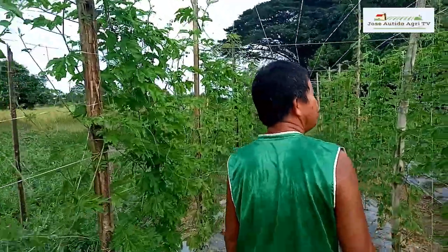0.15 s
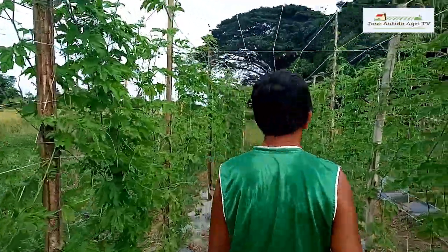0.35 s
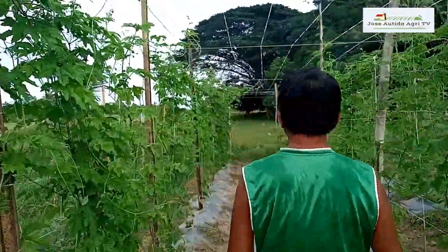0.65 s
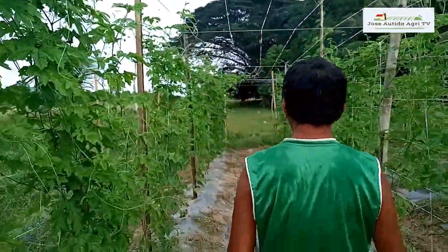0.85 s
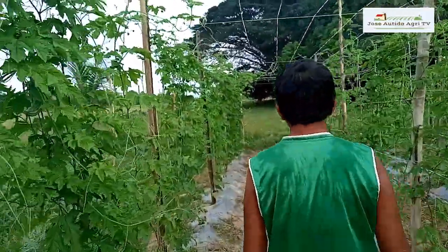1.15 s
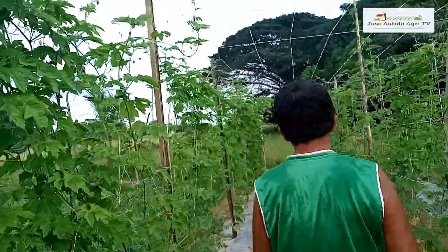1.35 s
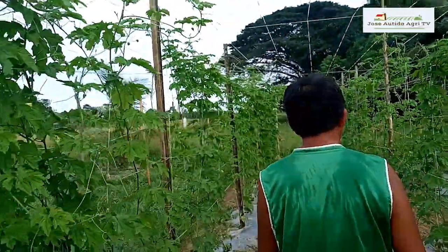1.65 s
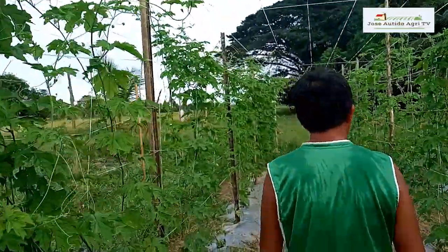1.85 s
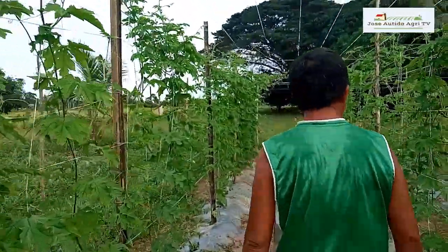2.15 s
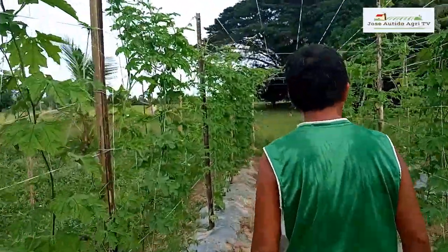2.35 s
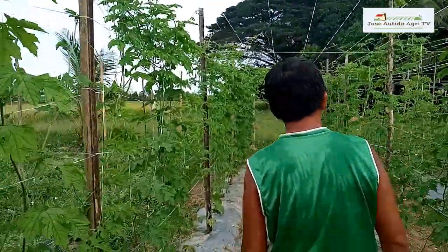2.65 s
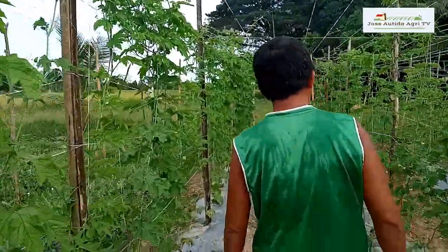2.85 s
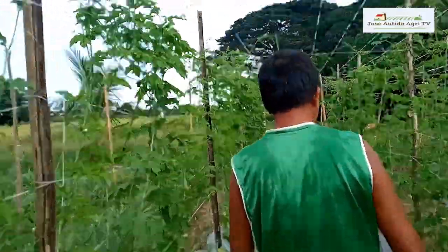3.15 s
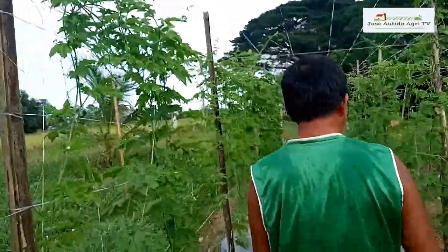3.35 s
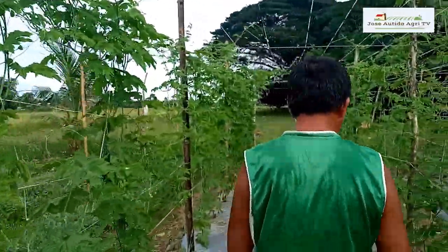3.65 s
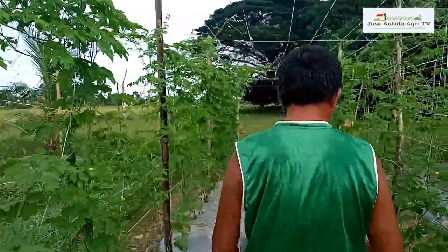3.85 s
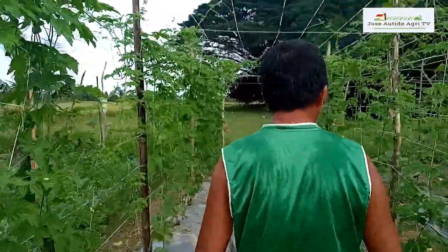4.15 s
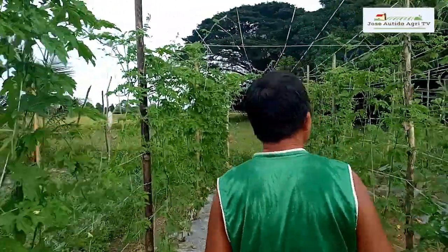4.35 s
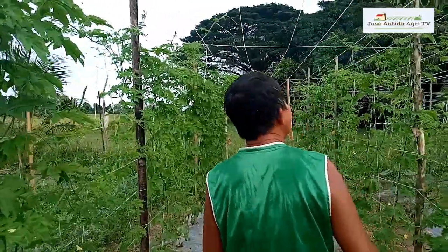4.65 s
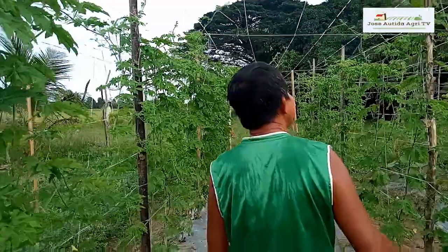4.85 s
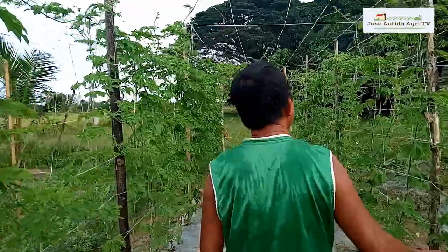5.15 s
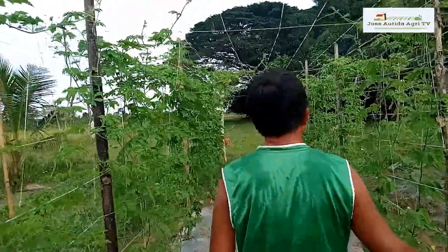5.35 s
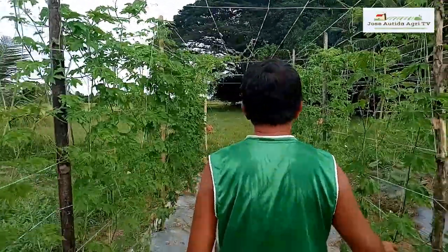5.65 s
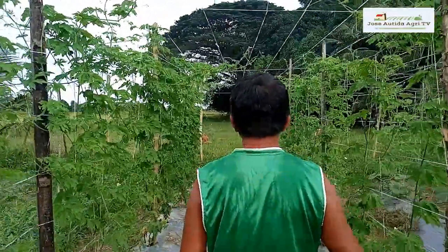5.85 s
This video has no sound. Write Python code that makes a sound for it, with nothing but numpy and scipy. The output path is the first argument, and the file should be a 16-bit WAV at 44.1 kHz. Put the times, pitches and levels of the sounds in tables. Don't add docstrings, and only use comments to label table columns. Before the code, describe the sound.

A young goat bleats twice with a short grunt between, while legs swish through grass, roosters crow far off and cicadas sing over a low engine rumble.

```python
import sys
import numpy as np
from scipy import signal
from scipy.fft import rfft, irfft
from scipy.io import wavfile

SR = 44100
rng = np.random.default_rng(int(sys.argv[2]) if len(sys.argv) > 2 else 0)


def wav_record(signal):
    frames = np.transpose(np.atleast_2d(signal))
    bounded = np.clip(frames, -1, 1)
    quanta = np.round(bounded * 32767).astype(np.int16)
    wavfile.write(sys.argv[1], SR, quanta)


def natural_amplitude(level_db):
    exponent = np.asarray(level_db, float) / 20
    return 10 ** exponent


N = 264159
T = np.arange(N) / SR

# (t/s, effort level/dB, mouth opening [0-1], tongue brightness level/dB)
BLEATS = [
    [(0, -27, 0.8, -3), (.03, -25.5, 0.97, -4), (.088, -21, 1, -5), (.113, -15.5, 0.66, -17.5),
     (.187, -18.5, 0.84, -21), (.222, -43, 0.8, 13), (.24, -34.5, .65, -9), (.258, -34.5, .6, -18)],
    [(1.81, -27.5, 0.1, -17), (1.86, -59, 0.2, -9), (1.875, -43, .3, 0)],
    [(1.876, -47, .5, 7), (1.908, -34, 0.98, -1), (1.976, -18, 1, -8.5), (2.065, -21.5, 0.82, -6.5),
     (2.16, -21, 0.29, -3.5), (2.22, -23, 0.3, -13.5), (2.275, -16, 0.26, -9), (2.32, -19.5, 0.8, -13),
     (2.38, -25, 0.77, -32)],
]
# (t/s, f/Hz)
BLEAT_PITCH = [
    [(0, 486), (.065, 475), (.115, 488), (.165, 485), (.195, 473), (.222, 472), (.255, 432), (.29, 395)],
    [(1.81, 355), (1.865, 372)],
    [(1.886, 449), (2.078, 448), (2.158, 472), (2.19, 463), (2.24, 473), (2.33, 457), (2.352, 438),
     (2.395, 345), (2.43, 330)],
]
# (mouth f/Hz, throat f/Hz, nose f/Hz, nose level/dB, top level re nose/dB)
TRACT = [
    (1610, 3450, 4880, -10.5, 2.5),
    (1157, 3280, 4200, -17, -6),
    (1410, 3070, 4300, -13.5, -7.5),
]
WIDTHS_HZ = [220, 580, 470, 1040]
# (t/s, length/s, depth level/dB)
TREMBLE = [(0.042, 0.043, 16.5), (0.14, 0.057, 24), (1.94, 0.047, 20), (2.009, 0.049, 27),
           (2.105, 0.025, 13)]
# (t/s, length/s, rise [share])
LIFTS = [(1.948, .035, .04), (2.01, .04, .05)]
CHEST_HZ, GRUNT_HZ, TOP_HZ, SHIMMER_DB = 940, 365, 6400, 1.6
TRACT_FOLLOWS, HELD_SHARE = 0.97, 0.99
SHUT_MOUTH_DB, OPEN_CHEST_DB, CHEST_DB, NOSE_FOLLOWS, TOP_FOLLOWS = 19.5, 41.5, -2.5, 0.21, 0.84
SINK_DULLS_DB = 69
TOP_OPENS_DB = 12
TAIL_S, TAIL_DB_PER_S = 0.032, 1300


def goat():
    out, jitter, breath = np.zeros(N), drift(22), rng.standard_normal(N)
    shimmer = [drift(38) for _ in range(4)]
    shut_db = swells(TREMBLE)
    lift = 1 + swells(LIFTS)
    for rows, tune, (*tract_hz, nose_db, top_db) in zip(BLEATS, BLEAT_PITCH, TRACT):
        span, edges = span_of(rows[0][0], rows[-1][0] + TAIL_S, 0.018)
        t = T[span]
        effort_db, opening, tongue_db = in_time(rows, t)
        effort_db = effort_db - TAIL_DB_PER_S * np.maximum(t - rows[-1][0], 0)
        opening = np.clip(opening, 0, 1)
        held = in_time(tune, t)[0]
        pitch = held * lift[span]
        turns = np.cumsum(pitch * (1 + 0.003 * jitter[span])) / SR

        sink = np.minimum(held / (HELD_SHARE * np.median(held)), 1) ** TRACT_FOLLOWS
        centres = [CHEST_HZ] + [hz * sink for hz in tract_hz]
        dulled_db = SINK_DULLS_DB * (1 - sink)
        levels_db = effort_db + np.array([
            CHEST_DB - OPEN_CHEST_DB * opening - dulled_db,
            -SHUT_MOUTH_DB * (1 - opening),
            tongue_db,
            nose_db + NOSE_FOLLOWS * tongue_db - dulled_db])
        levels = natural_amplitude(levels_db - np.outer([0.41, 0.95, 0.069, 0.54], shut_db[span]))
        chest, mouth, throat, nose = levels
        opens_db = TOP_OPENS_DB * np.linspace(-0.5, 0.5, len(pitch))
        top = nose * natural_amplitude(top_db + TOP_FOLLOWS * tongue_db + opens_db)

        broken = (0.14 * chest + 0.03 * mouth + 0.035 * throat) * natural_amplitude(6 * shimmer[0][span])
        grunt = 2.4 * mouth * peak(pitch, GRUNT_HZ, 36) ** 2
        voice = (grunt + broken) * np.sin(2 * np.pi * turns)
        voice += (0.21 * chest + 0.033 * mouth) * rms_one(band(breath[span], 120, 900))
        for k in range(2, 18):
            hz = k * pitch
            gain = sum(g * peak(hz, centre, width) ** 1.28
                       for g, centre, width in zip(levels, centres, WIDTHS_HZ))
            gain += top * peak(hz, TOP_HZ, 860) ** 2
            gain += 0.054 * mouth * peak(hz, 2100, 370) ** 2
            harmonic = np.sin(2 * np.pi * k * turns + 0.27 * k * k)
            voice += 1.56 * gain * natural_amplitude(SHIMMER_DB * shimmer[k % 4][span]) * harmonic

        puffs = breath[span] * (1 + 0.41 * np.sin(2 * np.pi * turns))
        for g, centre, width in zip(levels, centres, WIDTHS_HZ):
            middle = np.mean(centre)
            voice += natural_amplitude(-24.5) * g * rms_one(band(puffs, middle - width, middle + width, order=1))
        out[span] += voice * edges
    return echoes(out, wet_db=-20)


# (t/s, length/s, first partial level/dB, hoarse upper band level/dB)
CROW = [(3.368, 0.14, -52.5, -41), (3.618, 0.182, -51, -41), (3.816, 0.454, -45.5, -42),
        (4.44, 0.52, -56, -40.5), (4.934, 0.19, -43.5, -43), (3.355, 0.097, -52, -44),
        (3.62, 0.79, -60.5, -53), (4.444, 0.49, -63, -56)]
# (top f/Hz, end f/Hz, hoarseness [1])
CROW_PITCH = [(780, 735, .8), (868, 862, .6), (822, 800, 1), (826, 735, .6), (668, 640, .4), (700, 680, .6),
              (725, 745, 2), (715, 680, 1.5)]
BEAK_HZ, BEAK_WIDTH_HZ = 1700, 730
SCOOP_SHARE, SCOOP_S = 0.04, 0.03
CROW_ATTACK, CROW_RELEASE, CROW_FADE_DB = 0.095, 0.12, 4.5


def near_roosters():
    out = np.zeros(N)
    rasp = rms_one(band(rng.standard_normal(N), 1334, 1920, order=4))
    murmur = drift(51)
    waver, flicker, flicker_high = drift(57), drift(23.4), drift(32)
    for (s, length, first_db, upper_db), (top_hz, end_hz, hoarse) in zip(CROW, CROW_PITCH):
        span, along, shape = syllable(s, length, CROW_ATTACK, CROW_RELEASE, CROW_FADE_DB)
        scoop = 1 - SCOOP_SHARE * np.exp(-along * length / SCOOP_S)
        pitch = (top_hz + (end_hz - top_hz) * along ** 1.5) * scoop
        turns = np.cumsum(pitch * (1 + 0.012 * hoarse * (waver + flicker)[span])) / SR
        unsteady = natural_amplitude(2.2 * flicker[span]) + 0.7 * hoarse * murmur[span]
        first = unsteady * np.sin(2 * np.pi * turns)
        upper = sum(peak(k * pitch, BEAK_HZ, BEAK_WIDTH_HZ) ** 2 * np.sin(2 * np.pi * k * turns)
                    for k in (2, 3))
        upper += 0.13 * murmur[span] * np.sin(3 * np.pi * turns)
        upper = 0.84 * natural_amplitude(0.77 * flicker_high[span]) * upper + 0.31 * rasp[span]
        out[span] += shape * (natural_amplitude(first_db) * first + natural_amplitude(upper_db) * upper)
    return echoes(out, wet_db=5.5)


# (t/s, length/s, level/dB)
FAR_CROWS = [(0.358, 0.072, -60), (0.514, 0.12, -57.5), (.71, 0.73, -56), (1.11, 0.32, -57.5),
             (1.596, 0.4, -47.5), (2.382, .37, -60), (3.03, 0.19, -62.5), (3.601, 0.052, -50),
             (3.777, 0.27, -41.5), (4.03, 0.625, -57), (4.422, 0.16, -55), (5.744, 0.22, -53.5),
             (3.28, 0.047, -59), (4.33, 0.164, -59.5), (1.44, .09, -58)]
# (start f/Hz, end f/Hz, waver [share])
FAR_PITCH = [(1680, 1690, .005), (1695, 1700, .005), (1808, 1795, .009), (1790, 1750, .02),
             (1648, 1628, .002), (1628, 1598, .004), (1970, 2140, .012), (1900, 1910, .008),
             (1930, 1948, .003), (1940, 1915, .012), (1770, 1750, .008), (2050, 2150, .06),
             (1150, 1150, .02), (1180, 1140, .03), (1660, 1650, .006)]
FAR_ATTACK_S, FAR_RELEASE, FAR_FADE_DB = 0.012, 0.33, -2


def far_roosters():
    out = np.zeros(N)
    blur, waver, flicker = drift(75), drift(57), drift(32)
    for (s, length, level_db), (start_hz, end_hz, unsteady) in zip(FAR_CROWS, FAR_PITCH):
        span, along, shape = syllable(s, length, FAR_ATTACK_S / length, FAR_RELEASE, FAR_FADE_DB)
        pitch = start_hz + (end_hz - start_hz) * along
        turns = np.cumsum(pitch * (1 + unsteady * flicker[span])) / SR
        broken = min(unsteady / 0.006, 1)
        gain = natural_amplitude(3.6 * broken * waver[span]) + 0.68 * broken * blur[span]
        line = np.sin(2 * np.pi * turns) + 0.11 * np.sin(3 * np.pi * turns)
        out[span] += shape * natural_amplitude(level_db) * gain * line
    return echoes(out, wet_db=5.5)


# (peak t/s, rise/s per 20 dB, fall/s per 20 dB, bright swish level/dB, leaf rustle level/dB)
SWISH = [(.1, 0.087, 0.057, -47, -41), (.23, .15, 0.15, -60, -45), (.45, 0.07, 0.73, -31, -45.5),
         (.6, 0.25, 1.0, -34.5, -52), (.94, .1, 0.1, -47, -50), (1.15, 0.19, 0.25, -68, -44),
         (1.3, 0.046, .04, -36, -59), (1.352, 0.034, 0.036, -29, -45), (1.45, .07, 0.067, -29, -40),
         (1.57, .05, 0.017, -28, -39.5), (2.05, 0.34, 0.17, -29.5, -36.5), (2.29, 0.18, 0.18, -30, -34.5),
         (2.97, 0.054, 0.11, -46, -48), (3.19, 0.14, 0.26, -53, -56), (3.64, .07, .03, -35, -41),
         (3.73, .2, 0.4, -34.5, -41.5), (5.01, 0.083, 0.27, -53, -49.5), (5.44, 0.14, .15, -35, -49),
         (5.518, 0.13, 0.11, -29, -39.5), (5.68, 0.11, 0.1, -39, -36.5), (5.85, 0.049, .17, -41, -47.5)]
STILL_BRIGHT_DB, STILL_DULL_DB = -74, -67


def grass():
    *_, bright_db, dull_db = np.transpose(SWISH)
    bright = rms_one(band(crackle(per_s=4500, spread_db=4.5), 15900, 18100, order=1))
    dull = rms_one(band(crackle(per_s=4000, spread_db=4), 2200, 10700, order=1))
    bright_gain = brushed(bright_db, STILL_BRIGHT_DB) * natural_amplitude(2.5 * drift(40))
    dull_gain = brushed(dull_db, STILL_DULL_DB) * natural_amplitude(0.5 + 2.8 * drift(40))
    return bright_gain * bright + dull_gain * dull


def brushed(peaks_db, still_db):
    shapes = []
    for (s, rise, fall, *_), db in zip(SWISH, peaks_db):
        shapes.append(np.interp(T, [s - 3 * rise, s, s + 3 * fall], [db - 60, db, db - 60]))
    return natural_amplitude(still_db) + natural_amplitude(np.max(shapes, axis=0))


# (t/s, peak level/dB, centre f/Hz, length/s, treble level/dB)
STEPS = [(0.442, -50, 1170, .03, 0), (1.075, -42.5, 710, 0.047, -16), (1.438, -47.5, 490, 0.023, -20),
         (5.661, -40, 690, 0.024, -18), (0.913, -42.5, 2340, 0.013, -9), (1.085, -36.5, 1580, 0.016, -5),
         (1.151, -36.5, 1510, 0.014, -14), (1.17, -42.5, 1910, 0.055, -19),
         (1.318, -43.5, 2700, 0.0062, -12), (1.449, -48, 2000, .008, -5), (1.525, -50, 1804, 0.032, 4),
         (1.565, -53, 2000, 0.046, 7), (2.16, -29, 1700, 0.006, -20), (2.651, -60.5, 2550, 0.0051, 16),
         (2.909, -35.5, 1660, 0.027, 1.5), (2.962, -37, 1840, 0.024, 7.5), (3.545, -46, 1920, 0.045, -14),
         (3.674, -47.5, 2390, 0.022, 12.5), (3.71, -42, 2360, 0.035, -1), (4.997, -36.5, 2000, 0.013, -11),
         (5.033, -50.5, 1980, 0.027, 12.5), (5.517, -51, 2490, 0.027, 9), (5.616, -37, 2570, 0.0064, -12),
         (5.654, -32.5, 2320, 0.05, 4.5)]


def footfalls():
    out, grains = np.zeros(N), crackle(per_s=1300, spread_db=4.5)
    for s, level_db, hz, length, treble_db in STEPS:
        length = np.clip(length, 0.003, 0.04)
        t = np.arange(int(7.5 * length * SR)) / SR / length
        i = max(int((s - 0.15 * length) * SR), 0)
        piece = grains[i:i + len(t)]
        body = rms_one(band(piece, hz / 1.72, hz * 1.34))
        treble = rms_one(band(piece, 1600, 6300, order=1))
        shape = (1.67 * t * np.exp(-t * t * 0.84))[:len(piece)]
        out[i:i + len(t)] += natural_amplitude(level_db) * (body + natural_amplitude(treble_db) * treble) * shape
    return out


# (t/s, start f/Hz, end f/Hz, length/s, level/dB)
CHIPS = [
    (1.31, 5900, 6200, 0.058, -46),
    (3.81, 6500, 5200, 0.091, -38.5),
    (2.685, 440, 490, 0.037, -47.5),
]


def birds():
    out, flutter = np.zeros(N), drift(60)
    for s, start_hz, end_hz, length, level_db in CHIPS:
        n, i = int(length * SR), int(s * SR)
        hz = np.linspace(start_hz, end_hz, n) * (1 + 0.018 * flutter[i - n:i])
        tone = np.sin(2 * np.pi * np.cumsum(hz) / SR)
        out[i:i + n] += natural_amplitude(level_db) * np.hanning(n) * natural_amplitude(5 * flutter[i:i + n]) * tone
    return echoes(out, wet_db=-10)


# (f/Hz, width f/Hz, level/dB)
CICADAS = [(3830, 760, -13.5), (7777, 725, 0), (11080, 840, -4.5), (15540, 900, -15.5)]
# (t/s, length/s, level/dB)
SURGES = [(2.25, 0.37, 2), (3.25, 0.16, 2.5), (4.185, 0.26, 1.5), (5.077, 0.27, 2), (5.6, 0.11, 1)]
# (t/s, length/s, level/dB)
BUZZES = [(.15, 0.11, -45), (1.49, 0.17, -42.5), (3.267, 0.25, -40), (5.16, 0.1, -40.5)]
BUZZER_HZ, BUZZER_WIDTH_HZ, BUZZES_PER_S = 7550, 450, 177
CHORUS_DB = -43.5


def cicadas():
    hz, white = np.fft.rfftfreq(N, 1 / SR), rfft(rng.standard_normal(N))
    shape = sum(natural_amplitude(level_db) * np.exp(-1.4 * ((hz - centre) / width) ** 2)
                for centre, width, level_db in CICADAS)
    chorus_db = CHORUS_DB + swells(SURGES) + 2.5 + 1.18 * drift(14.4)
    chorus = rms_one(irfft(white * shape, N)) * natural_amplitude(chorus_db)
    turns = np.cumsum(BUZZES_PER_S * (1 + 0.026 * drift(7.3))) / SR
    pulses = np.maximum(np.sin(2 * np.pi * turns), 0)
    half = BUZZER_WIDTH_HZ / 2
    buzz = rms_one(band(pulses * rng.standard_normal(N), BUZZER_HZ - half, BUZZER_HZ + half))
    return chorus + buzz * sum(natural_amplitude(level_db) * swell(s, length) for s, length, level_db in BUZZES)


# (f/Hz, level/dB per Hz)
RUMBLE = [(22, -28), (40, -13), (52, -9.5), (129, 0), (163, -5), (198, -14), (249, -30.5), (420, -72)]
# (f/Hz, width f/Hz, level/dB)
FIRING = [(71.8, 15, -43), (96.8, 28, -44.5), (146.7, 52, -42.5)]
# (t/s, length/s, rumble gain level/dB, upper edge gain level/dB)
PULLS = [(0, 0.37, 5, 5), (1.886, 0.84, 2.5, 9), (2.907, 0.42, 4.5, 9), (3.741, 0.24, 6.5, 6.5),
         (4.613, 0.97, 6, 13), (5.793, .3, 6, -1)]
RUMBLE_DB, EDGE_DB = -33.5, -13.5


def engine():
    level_db = RUMBLE_DB - 2.5 + swells(PULLS)
    edge_db = EDGE_DB + swells(PULLS, column=3)
    high_pass = signal.butter(1, 70, "high", fs=SR, output="sos")
    rumble = signal.sosfilt(high_pass, coloured(RUMBLE))
    edge = rms_one(band(rumble, 162.6, 350))
    orders = sum(natural_amplitude(db) * rms_one(band(rumble, hz - width / 2, hz + width / 2, order=1))
                 for hz, width, db in FIRING)
    unsteady = rumble * natural_amplitude(1.4 * drift(22))
    return natural_amplitude(level_db - 4.5) * (unsteady + natural_amplitude(edge_db - 1) * edge) + orders


# (f/Hz, level/dB per Hz)
AIR = [(200, -6.5), (320, 2), (1600, 2.5), (2600, -3), (5500, -12.5), (9300, -11.5), (13300, -10),
       (15600, -4.5)]
# (t/s, length/s, gain level/dB)
GUSTS = [(0.253, .15, 12.5), (0.586, 0.3, 5.5), (1.278, 0.48, 5), (2.08, 0.39, 17.5), (3.718, 0.31, 11),
         (5.615, 0.54, 8)]
AIR_DB, LEAVES_DB = -50.5, -58


def breeze():
    hiss = coloured(AIR)
    murmur = band(hiss, 213, 4800)
    leaves_db = LEAVES_DB + swells(GUSTS) + 1.9 * drift(3.3)
    return natural_amplitude(AIR_DB) * (hiss - murmur) + natural_amplitude(leaves_db) * murmur


# (delay t/s, level/dB)
ECHOES = [(0.01, -9), (.029, -16.5), (0.045, -7), (0.082, -18)]


def echoes(x, wet_db):
    out = x.copy()
    for lag, level_db in ECHOES:
        k = int(lag * SR)
        out[k:] += natural_amplitude(level_db + wet_db) * x[:-k]
    return out


def crackle(per_s, spread_db):
    sizes_db = spread_db * np.minimum(rng.exponential(1, N), 4)
    sizes = natural_amplitude(sizes_db) * rng.choice([-1, 1], N)
    snaps = sizes * (rng.random(N) < per_s / SR)
    return rms_one(snaps + 0.43 * rng.standard_normal(N))


def coloured(points):
    hz = np.fft.rfftfreq(N, 1 / SR) + 1
    f, level_db = np.transpose(points)
    gain = natural_amplitude(np.interp(np.log(hz), np.log(f), level_db))
    return rms_one(irfft(rfft(rng.standard_normal(N)) * gain, N))


def drift(rate):
    r = np.exp(-40 * np.pi * rate / SR)
    slow = signal.lfilter([1], [1, -2 * r, r * r], rng.standard_normal(N // 20 + 2002))[2000:]
    return np.interp(np.arange(N) / 20, np.arange(len(slow)), rms_one(slow))


def band(x, low_hz, high_hz, order=2):
    edges = [low_hz, min(high_hz, 0.45 * SR)]
    return signal.sosfilt(signal.butter(order, edges, "band", fs=SR, output="sos"), x)


def peak(hz, centre_hz, width_hz):
    return 1 / (1 + (2 * (hz - centre_hz) / width_hz) ** 2)


def rms_one(x):
    return x / np.sqrt(np.mean(x ** 2) + 1e-20)


def in_time(rows, t=T):
    s, *columns = np.transpose(rows)
    return [np.interp(t, s, c) for c in columns]


def span_of(start, end, fade):
    span = slice(int(start * SR), int(end * SR))
    t = T[span]
    since_start = t - t[0] + (t[0] < 0.005)
    return span, np.clip(np.minimum(since_start, t[-1] - t) / fade, 0, 1)


def swell(s, length):
    return np.interp(T, s + length * np.linspace(-1, 1, 41), np.hanning(41))


def swells(rows, column=2):
    return sum(row[column] * swell(row[0], row[1]) for row in rows)


def syllable(s, length, attack, release, fade_db):
    span = slice(int(s * SR), int((s + length) * SR))
    along = np.clip((T[span] - s) / length, 0, 1)
    shape = np.clip(np.minimum(along / attack, (1 - along) / release), 0, 1)
    return span, along, shape * natural_amplitude(-fade_db * along)


def scene():
    animals = goat() + near_roosters() + far_roosters() + birds() + cicadas()
    return (animals + grass() + footfalls() + engine() + breeze())[None]


def top_cut(x):
    return signal.sosfilt(signal.butter(12, 17020, fs=SR, output="sos"), x)


def record(dry):
    below_cut = np.fft.rfftfreq(N, 1 / SR) < 15700
    mix = irfft(rfft(dry) * below_cut, N)
    return top_cut(mix)


dry = scene()
out = record(dry)
wav_record(out)
```